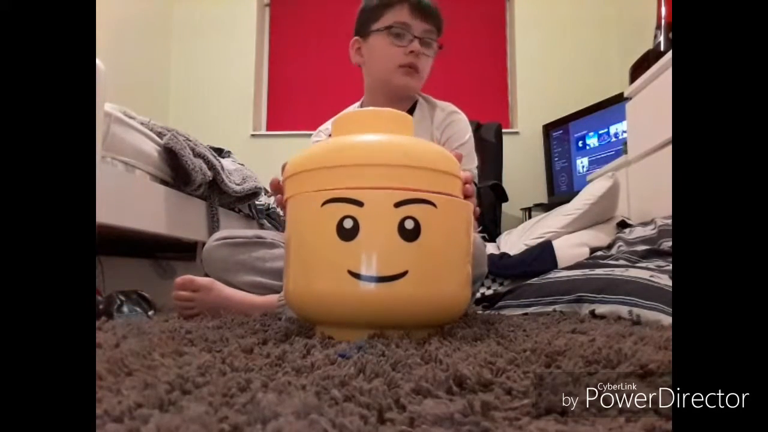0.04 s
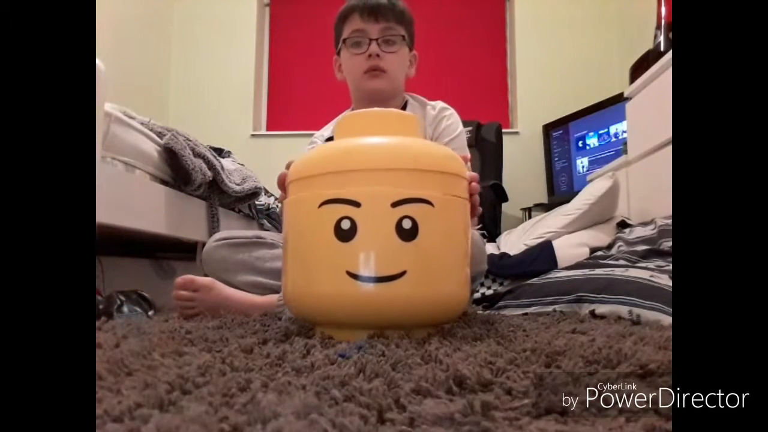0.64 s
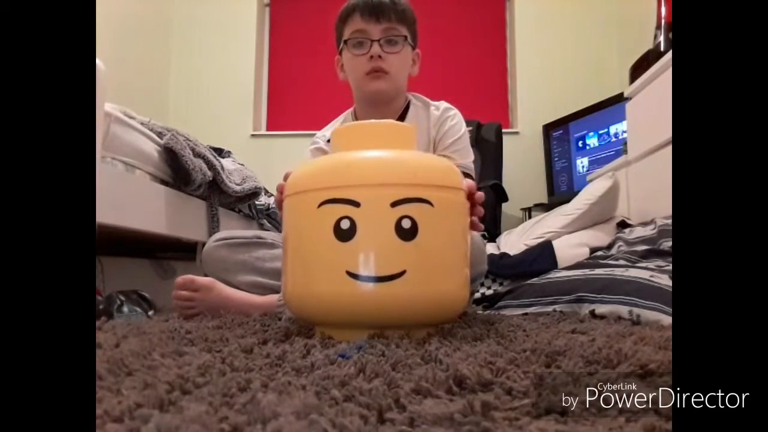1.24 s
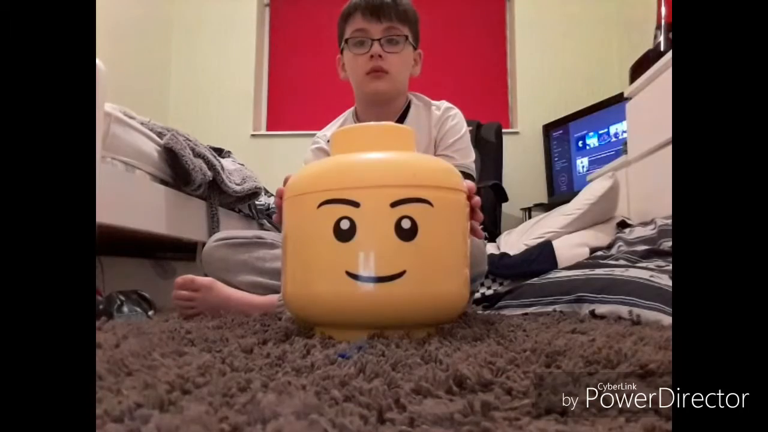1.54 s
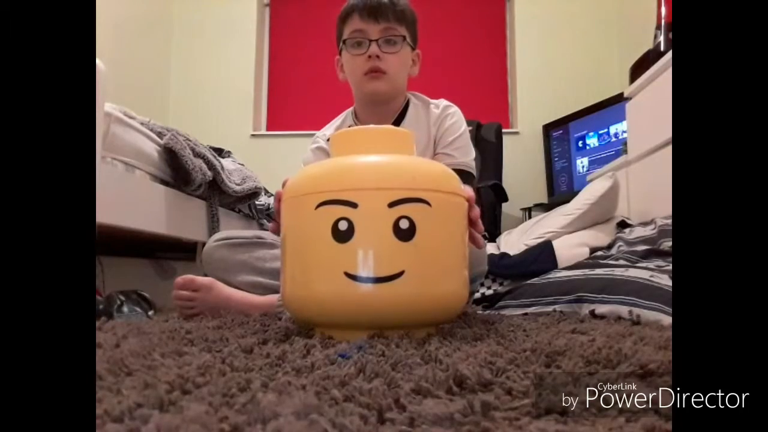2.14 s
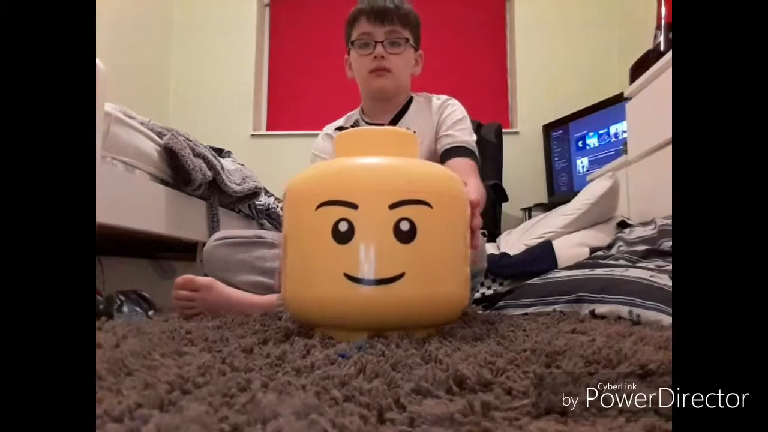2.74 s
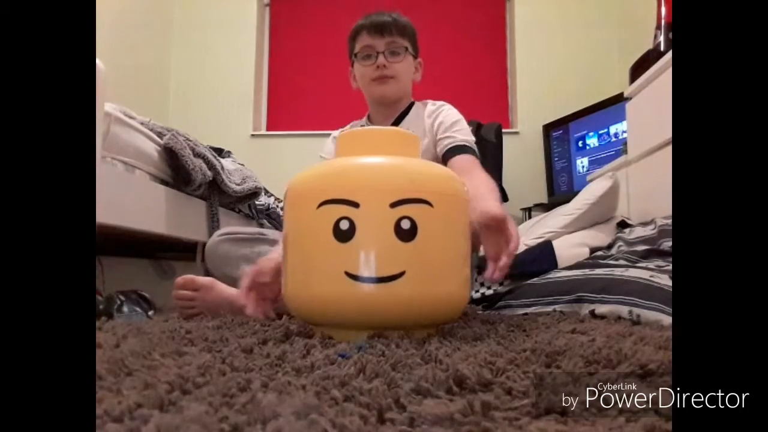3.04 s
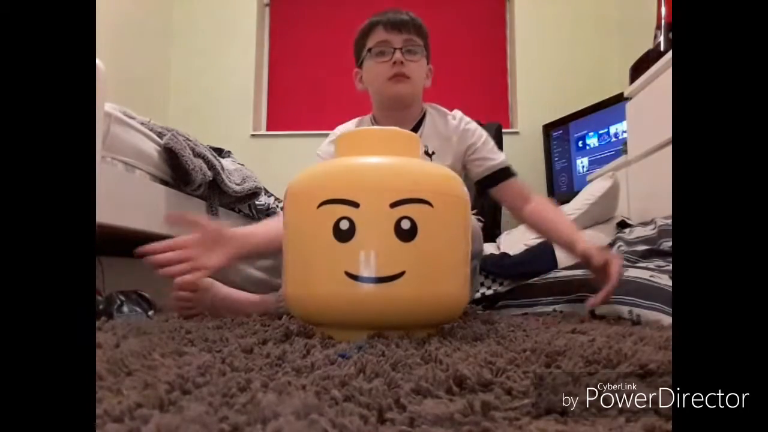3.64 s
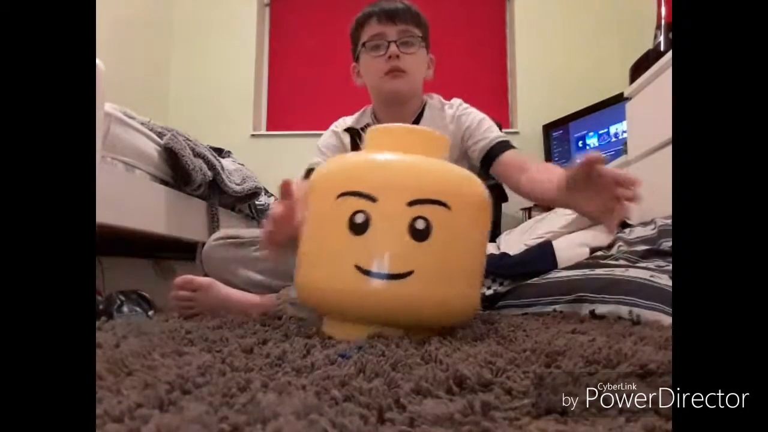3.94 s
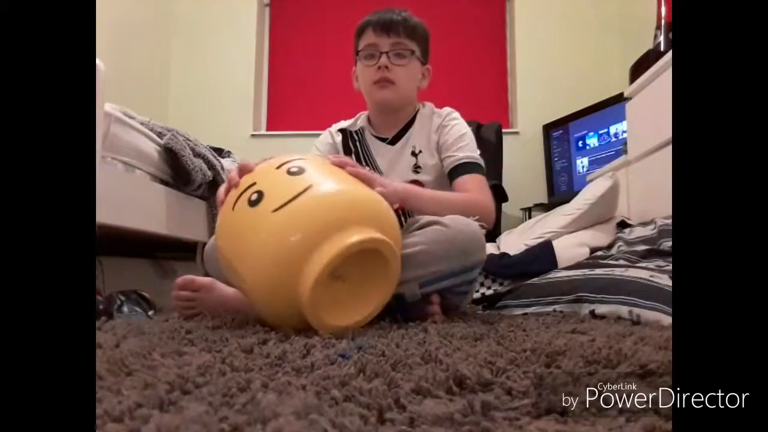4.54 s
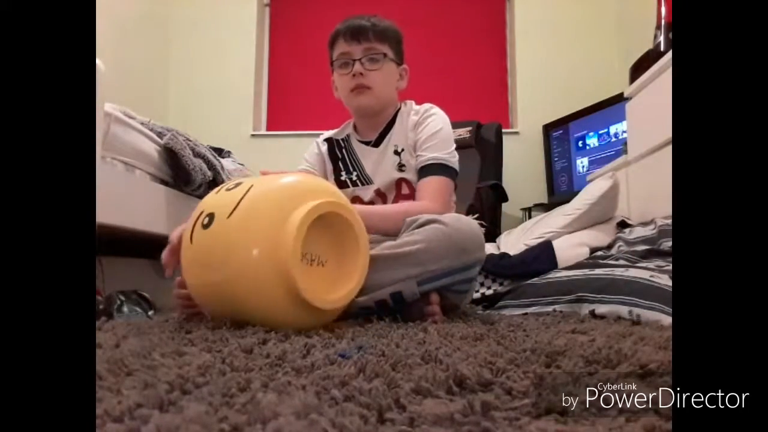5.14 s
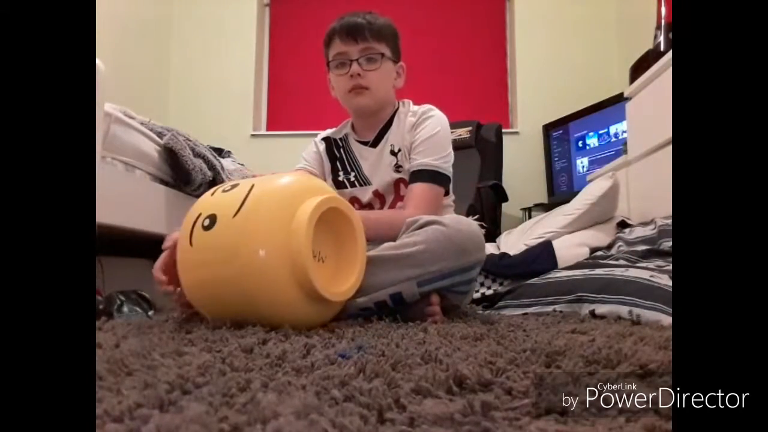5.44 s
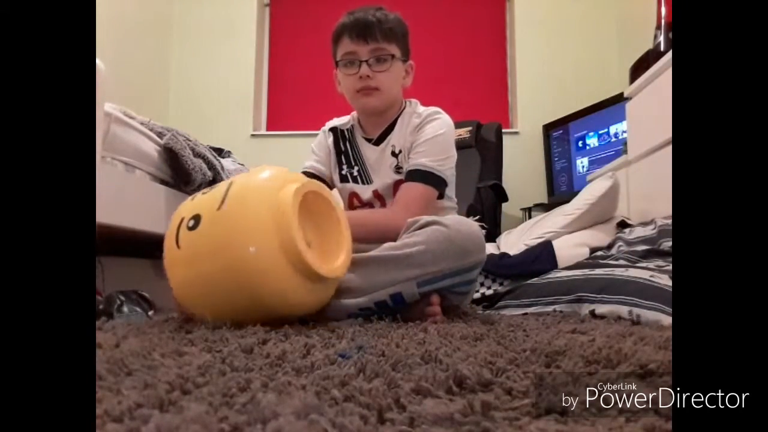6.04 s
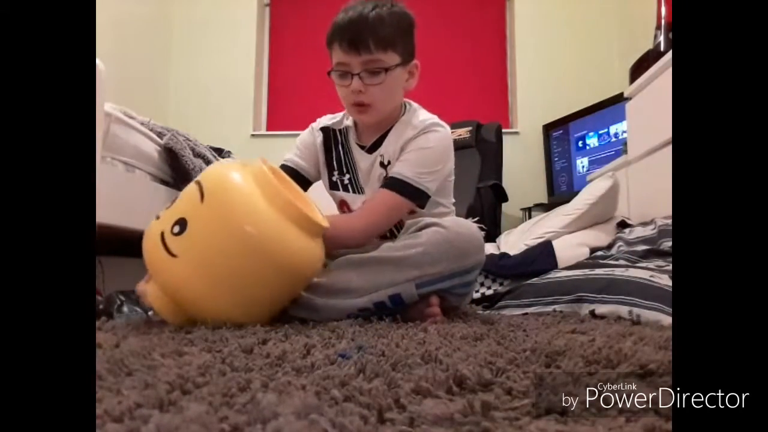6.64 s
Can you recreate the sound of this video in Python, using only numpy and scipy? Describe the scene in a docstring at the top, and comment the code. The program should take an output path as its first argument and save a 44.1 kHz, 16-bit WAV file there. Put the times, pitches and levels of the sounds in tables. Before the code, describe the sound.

Hands press the lid of a big hollow plastic container, making dull creaks and soft finger bumps. After a lull and a few faint taps and brushes of skin, two loud palm slaps make the tub ring briefly. It is then dragged over shaggy carpet with a low drone, a hiss and crisp crackles, ending in a few knocks and tiny squeaks. A small, sharp-sounding microphone picks it up close by in a small bedroom.

```python
"""Dull creaks and finger bumps come first: the lid of a big hollow plastic tub is pressed home,
sticking and slipping on its rim. Skin brushes the wall, then two palm slaps set the whole tub ringing.
Last, it is dragged through shaggy carpet: the wall drones, the fibres hiss and tufts snap free.
A small bedroom adds a short tail, and the small microphone has a sharp treble resonance."""
import sys
import numpy as np
from scipy import signal
from scipy.fft import rfft, irfft
from scipy.io import wavfile
from scipy.ndimage import uniform_filter1d

SR = 44100
rng = np.random.default_rng(int(sys.argv[2]) if len(sys.argv) > 2 else 0)


def master_out(mix):
    """Clip the mix to full scale and print it as 16-bit PCM to the path in sys.argv[1]."""
    frames = np.transpose(np.atleast_2d(mix))
    ceiling = np.clip(frames, -1, 1)
    pcm = np.round(ceiling * 32767).astype(np.int16)
    wavfile.write(sys.argv[1], SR, pcm)


N = 303849
TIME = np.arange(N) / SR


def from_db(db):
    return 10 ** (np.asarray(db) / 20)


def rms_one(x):
    return x / np.sqrt(np.mean(x ** 2) + 1e-20)


def peak_one(x):
    return x / (np.max(np.abs(x)) + 1e-20)


def add(track, start_s, sound):
    at = max(round(start_s * SR), 0)
    track[at:at + len(sound)] += sound[:N - at]


def band(x, low_hz, high_hz):
    edges = [low_hz, min(high_hz, .45 * SR)]
    return signal.sosfilt(signal.butter(2, edges, "band", fs=SR, output="sos"), x)


def equalise(x, curve, size=4096):
    """Minimum-phase EQ through points of f/Hz, gain/dB."""
    hz, db = np.transpose(curve)
    grid = np.maximum(np.arange(size // 2 + 1) * SR / size, 1)
    cepstrum = irfft(np.log(from_db(np.interp(np.log(grid), np.log(hz), db))))
    cepstrum[1:size // 2] *= 2
    cepstrum[size // 2 + 1:] = 0
    return signal.oaconvolve(x, irfft(np.exp(rfft(cepstrum))))[:N]


def grains(per_s, spread_db):
    """Tiny slips at random moments, of uneven size and either sign."""
    sizes = from_db(spread_db * np.minimum(rng.exponential(1, N), 4))
    return rms_one((rng.random(N) < per_s / SR) * sizes * rng.choice([-1, 1], N))


def flutter(depth_db, per_s):
    """A gain that wanders at random."""
    knots = np.arange(0, N / SR + 1, 1 / per_s)
    return rms_one(from_db(depth_db * np.interp(TIME, knots, rng.standard_normal(N)[:len(knots)])))


def swell(full_s, hold_s, rise_db_per_s, fall_db_per_s, step=16):
    """Envelope of a gesture: it fades up until full_s, holds and dies away."""
    t = TIME[::step] - full_s
    down_db = rise_db_per_s * np.maximum(-t, 0) + fall_db_per_s * np.maximum(t - hold_s, 0)
    return np.repeat(from_db(-np.minimum(down_db, 200)), step)[:N]


# EQ of the room's still air: f/Hz, gain/dB
AIR_EQ = [(20, -10), (45, -4.5), (130, -1), (330, -5.5), (600, -17), (1500, -28), (4000, -38.5),
          (8000, -43), (11000, -35), (15000, -69.5)]

def room_tone():
    """A faint, low bed of noise."""
    return from_db(-65.5) * rms_one(equalise(rng.standard_normal(N), AIR_EQ))


def bedroom(x, wet_db, build_s, mid_t60=0.28):
    """Reflections thicken within milliseconds and die quickly, the mids last."""
    t = TIME[:20000]
    zones = [(220, 536, 0.21), (986, 10300, mid_t60), (3480, .45 * SR, 0.24)]   # low/Hz, high/Hz, t60/s
    tail = sum(band(rng.standard_normal(len(t)), low, high) * from_db(-60 * t / t60)
               for low, high, t60 in zones)
    tail *= 1 - np.exp(-(t / build_s) ** 2)
    return x + from_db(wet_db) * signal.oaconvolve(x, tail / np.linalg.norm(tail))[:N]


# skin and sleeves graze the wall: t/s, hold/s, level/dB
GRAZES = [(0.055, .035, -58.5), (0.368, 0.05, -69), (2.857, .02, -60.5), (3.03, .07, -65.5),
          (3.138, 0.035, -59), (3.3, 0.14, -70), (3.517, 0.14, -74)]
# EQ of skin on plastic: f/Hz, gain/dB
SKIN_EQ = [(200, -24), (1000, -9.5), (3000, -6), (5000, -12.5), (8000, 0.5), (11000, 1.5), (15000, -10.5)]

def brush():
    """Soft hiss of skin and cloth on smooth plastic."""
    gestures = [from_db(db) * swell(s, hold, rise_db_per_s=120, fall_db_per_s=127)
                for s, hold, db in GRAZES]
    hiss = rms_one(equalise(grains(per_s=39000, spread_db=-4), SKIN_EQ))
    return from_db(-7) * np.max(gestures, axis=0) * hiss


# the rubbing locks into a creak or squeak: centre t/s, level/dB, f/Hz, half-length/s
SQUEAKS = [(0.02, -36.5, 283, 0.022), (0.301, -24.5, 247.5, 0.023), (.67, -37, 183, 0.024),
           (0.722, -35, 202.2, .018), (2.472, -51, 472, .014), (2.794, -45.5, 253.8, 0.031),
           (4.586, -25.5, 412.6, 0.011), (6.32, -35.5, 398, .025), (6.445, -28, 1880, 0.0057),
           (6.482, -27, 426, .009), (6.549, -23.5, 1413, 0.0057), (6.598, -31, 425, .008),
           (6.679, -21.5, 2492, 0.0025), (6.872, -40.5, 375.4, 0.02)]

def creaks(waver=0.091, octave_db=-13.5):
    """Regular stick-slip: a short swell on a wavering pitch, with its octave."""
    out = np.zeros(N)
    for s, db, hz, half_length in SQUEAKS:
        t = TIME[:int(6 * half_length * SR)]
        middle = t[-1] / 2
        wander = rms_one(uniform_filter1d(rng.standard_normal(len(t)), int(2 * SR / hz)))
        phase = 2 * np.pi * hz * np.cumsum(1 + waver * wander) / SR
        tone = np.sin(phase) + from_db(octave_db) * np.sin(2 * phase)
        envelope = np.exp(-((t - middle) / half_length) ** 2)
        add(out, s - middle, from_db(db - 1.5) * envelope * tone)
    return out


# modes of the tub and the air inside; the lowest three beat: f/Hz, level/dB, t60/s at damping 1
TUB_MODES = [(95, -17, 0.34), (105, -3.5, 0.12), (110, -13.5, 0.27), (149.4, -18, 0.36),
             (176.5, -9.5, 0.22), (269, -8, 0.09), (299.7, -4.5, 0.08), (344.4, -10, 0.14),
             (422, -11, 0.092), (473.5, -12.5, 0.037), (648, -14, 0.049), (715, -19, 0.045),
             (976, -16.5, 0.033)]

def tub_ring(damping):
    """Each mode's strength varies with the spot touched; hands and carpet damp the ring."""
    hz, db, t60 = np.transpose(TUB_MODES)[:, :, None]
    t = TIME[:16384]
    spot_db = rng.normal(0, 1.5, db.shape)
    return np.sum(from_db(db + spot_db - 60 * t * damping / t60) * np.sin(2 * np.pi * hz * t), axis=0)


def rubbed_wall(slips, curve, damping, ring_db):
    """Slips shake the wall directly and through its modes."""
    ring = rms_one(signal.oaconvolve(slips, np.diff(tub_ring(damping)))[:N])
    return rms_one(equalise(slips + from_db(ring_db) * ring, curve))


# hands press and the lid creeps on the rim: t/s, hold/s, groan/dB, rasp/dB
LID_PRESSES = [(0.022, 0.07, -36.5, -54.5), (0.227, .015, -42.5, -61.5), (0.286, 0.017, -29.5, -59),
               (0.358, 0.073, -44, -60.5), (0.538, 0.073, -55, -73), (0.667, 0.14, -46.5, -71),
               (0.867, 0.052, -50, -72), (0.99, 0.03, -57.5, -70.5), (2.745, 0.045, -42, -65.5),
               (2.852, 0.054, -55, -67), (3.563, 0.16, -68, -73.5)]
# thin resonances of the rim: f/Hz, width/Hz, level/dB
RIM_MODES = [(1090, 160, 6.5), (1830, 150, 2), (2640, 260, -6), (3740, 42, -6.5), (6500, 160, -15)]
# EQs of the lid's low groan and midrange rasp: f/Hz, gain/dB
GROAN_EQ = [(50, -49), (110, -5), (190, 6.5), (255, 8), (330, -4.5), (480, -3), (750, -16), (1500, -60.5)]
RASP_EQ = [(80, -36), (400, -24.5), (1500, 6), (3000, -8), (5000, -36), (15000, -34)]

def lid():
    """Stick-slip on the rim: a hollow groan, and a dry rasp that sings in the rim's resonances."""
    groan_gain, rasp_gain = sum(
        from_db(levels_db)[:, None] * swell(s, hold, rise_db_per_s=420, fall_db_per_s=256.5)
        for s, hold, *levels_db in LID_PRESSES)
    slips = grains(per_s=700, spread_db=3.5)
    groan = rubbed_wall(slips, GROAN_EQ, damping=2.1, ring_db=-14.5)
    grit = slips + grains(per_s=3500, spread_db=3.5)
    sing = sum(from_db(db) * signal.lfilter(*signal.iirpeak(hz, hz / width, fs=SR), grit)
               for hz, width, db in RIM_MODES)
    rasp = rms_one(sing) + rms_one(equalise(grit, RASP_EQ))
    return from_db(-6.5) * groan_gain * groan + from_db(-10) * rasp_gain * rasp


# EQs of a hit's plastic clack and bright contact tick: f/Hz, gain/dB
CLACK_EQ = [(80, -7), (300, 2), (700, 5), (1100, -5), (1600, 3.5), (2100, -7.5), (2900, -9), (4500, -20),
            (15000, -37)]
TICK_EQ = [(200, -45), (1500, -29), (4000, -6), (8500, 4.5), (15000, 4.5)]

def hits(rows, damping, ring_trim_db, clack_t60, tick_trim_db, tick_t60, clack_trim_db=-1.5):
    """The struck panel flexes, the whole tub rings, its dense upper modes clack and the contact ticks."""
    out = np.zeros(N)
    for s, flex_db, flex_hz, flex_t60, ring_db, clack_db, tick_db in rows:
        ring = tub_ring(damping)
        t = TIME[:len(ring)]
        attack = 1 - np.exp(-4 * t * flex_hz)   # soft skin: the force builds over a quarter cycle
        flex = attack * from_db(-60 * t / flex_t60) * np.sin(2 * np.pi * flex_hz * t)
        add(out, s, from_db(flex_db) * peak_one(flex))
        add(out, s, from_db(ring_db + ring_trim_db) * peak_one(ring))
        for db, t60, curve in [(clack_db + clack_trim_db, clack_t60, CLACK_EQ),
                               (tick_db + tick_trim_db, tick_t60, TICK_EQ)]:
            burst = equalise(rng.standard_normal(len(t)) * from_db(-60 * t / t60), curve)
            add(out, s, from_db(db) * peak_one(burst))
    return out


# fingers and legs bump the held tub: t/s, flex level/dB, flex f/Hz, flex t60/s, clack/dB
BUMPS = [(0.036, -30.5, 260, 0.028, -58), (0.148, -36, 215, 0.049, -52), (0.2285, -33, 265, 0.027, -48),
         (0.355, -28, 234, 0.061, -41.5), (0.4191, -26, 220, 0.049, -44), (0.749, -29, 211, 0.023, -56),
         (0.763, -29.5, 174, .05, -64), (0.795, -35, 173, 0.045, -58), (0.889, -34.5, 158.5, 0.065, -56),
         (2.092, -48, 127, .03, -67), (2.21, -49, 114, 0.069, -65), (2.287, -37, 166, 0.012, -59),
         (2.309, -38.5, 144, 0.027, -57.5), (2.37, -37, 200, 0.0075, -65), (2.455, -40.5, 264, 0.015, -53),
         (2.587, -41, 257, 0.036, -51.5), (2.631, -45, 276, 0.0058, -62), (2.91, -39.5, 110, 0.023, -56),
         (2.98, -42.5, 80.6, 0.064, -61), (3.569, -40.5, 164, 0.011, -62), (4.17, -30.5, 397, 0.0092, -47),
         (4.49, -38.5, 120, 0.035, -38.5), (4.516, -29.5, 490, 0.0075, -49.5),
         (4.574, -36.5, 150, 0.07, -46), (5.1439, -23, 427, 0.0032, -39.5), (6.242, -31, 380, 0.011, -58),
         (6.425, -23, 403, 0.046, -30), (6.521, -23, 420, 0.033, -24.5), (6.661, -18.5, 304, 0.046, -20.5),
         (6.776, -32.5, 296, 0.067, -48)]

def knocks(ring_db_per_octave=-14):
    """Light bumps; a soft, low-pitched spot sets more of the whole tub ringing."""
    rows = [(s, db, hz, t60, db + ring_db_per_octave * np.log2(hz / 100), clack_db, clack_db)
            for s, db, hz, t60, clack_db in BUMPS]
    return hits(rows, damping=0.38, ring_trim_db=-7, clack_t60=0.092, tick_trim_db=-5.5, tick_t60=0.014)


# palm and lid impacts: t/s, flex level/dB, flex f/Hz, flex t60/s, ring/dB, clack/dB, tick/dB
PALM_HITS = [(3.897, -12.5, 177, 0.038, -38, -19, -21.5), (3.9048, -12.5, 422, 0.0078, -7.5, -13, -42),
             (3.9115, -31, 285, 0.015, -31, -16, -23), (3.924, -13.5, 206, 0.027, -34, -13.5, -21.5),
             (3.9405, -17, 268, 0.013, -29, -16, -24), (4.2565, -13, 263, 0.034, -15, -16, -16.5),
             (4.267, -9, 460, 0.002, -13.5, -23, -36.5), (4.276, -17, 283, 0.0066, -23, -16, -45)]

def slaps():
    """Two tight clusters of hits: a palm lands and the lid jolts on its rim."""
    return hits(PALM_HITS, damping=0.96, ring_trim_db=0.5, clack_t60=0.076,
                tick_trim_db=-1.5, tick_t60=0.06)


# pulls through the pile: start t/s, full speed t/s, hold/s, stop t/s, rise/(dB/s), fall/(dB/s),
# friction/dB, wall drone/dB, fibre crackle/dB
DRAG_STROKES = [(4.4, 4.595, .095, 4.927, 229, 219, -32, -32.5, -18),
                (5.004, 5.487, 0.013, 6.014, 72.5, 45, -34.5, -32.5, -22.5),
                (6.14, 6.378, 0.13, 6.65, 108, 81, -34, -33.5, -25.5),
                (6.669, 6.676, 0.013, 6.78, 260, 210, -35, -30, -29.5),
                (6.774, 6.78, 0.025, 7.07, 198, 40, -48.5, -47.5, -41)]

def drag_envelopes(stick_db_per_s=304, drone_lead_s=0.021, crackle_power=1.327):
    """Friction, drone and crackle gains: each stroke breaks loose, speeds up, slows and sticks."""
    creep_db = [-67.5, -57.5, -68.5]   # a floor from 5 to 6 s, as the tub creeps in the pile
    gains = from_db(creep_db)[:, None] * swell(5, 1, stick_db_per_s, stick_db_per_s)
    for start, full, hold, stop, rise, fall, *levels_db in DRAG_STROKES:
        loose = swell(start, stop - start, stick_db_per_s, stick_db_per_s)
        speed = swell(full, hold, rise, fall)
        load = swell(full - drone_lead_s, hold, rise, fall)   # the wall loads before the fibres give
        stroke = from_db(levels_db)[:, None] * loose * [speed, load, speed ** crackle_power]
        gains = np.maximum(gains, stroke)
    return gains


# EQs of the droning wall, the sliding friction and the crackling fibres: f/Hz, gain/dB
DRONE_EQ = [(40, -37.5), (130, -12), (250, -3.5), (400, -0.5), (560, -0.5), (800, -7.5), (1500, -4.5),
            (4000, -53)]
FRICTION_EQ = [(60, -37), (250, -24.5), (600, -0.5), (1200, 1), (1650, 6.5), (2600, 4.5), (4000, 4.5),
               (7000, -13.5), (15000, -6)]
FIBRE_EQ = [(200, -50), (1500, -41), (3500, -15.5), (5500, 3), (8500, 1.5), (11000, -4.5), (15000, -7)]

def carpet_drag(friction, drone, crackle):
    """Thousands of fibres slip under the tub: the wall drones, the pile hisses and crackles."""
    catching = flutter(depth_db=2, per_s=130)   # the rim catches and lets go unevenly
    slips = grains(per_s=1500, spread_db=0.5)
    wall = from_db(-3.5) * drone * rubbed_wall(slips, DRONE_EQ, damping=1.7, ring_db=-15)
    hiss = from_db(-0.5) * friction * rms_one(equalise(grains(per_s=6000, spread_db=3), FRICTION_EQ))
    # tufts let go in clumps, which ring briefly in six treble bands
    clumps = sum(band(grains(per_s=160, spread_db=5.5), hz / 1.13, hz * 1.09)
                 for hz in np.geomspace(3500, 13000, num=6))
    fibres = equalise(grains(per_s=2600, spread_db=4.5), FIBRE_EQ)
    pile = crackle * (from_db(-11) * rms_one(fibres) + from_db(-18.5) * rms_one(clumps))
    # the faster the stroke, the more fizz on top
    fizz_gain = from_db(-12.5) * crackle * (crackle / crackle.max()) ** 1.3
    fizz = fizz_gain * rms_one(band(grains(per_s=340, spread_db=-5.5), 11200, 16000))
    return catching * (wall + hiss + pile + fizz)


def small_tufts(crackle, per_s=28, above_crackle_db=3, spread_db=3.5):
    """Lesser tufts snap at random while the pile crackles: rows of t/s, level/dB."""
    chance, size = rng.random(N), rng.standard_normal(N)
    crackling = crackle > crackle.max() / 100
    at = np.flatnonzero(crackling & (chance < per_s / SR))
    return list(zip(TIME[at], 20 * np.log10(crackle[at]) + above_crackle_db + spread_db * size[at]))


# the biggest tufts catch on the rim and snap free: t/s, level/dB
BIG_TUFTS = [(4.4925, -38), (4.561, -16.5), (4.6197, -9.5), (4.6743, -21), (5.1225, -36.5), (5.2664, -23),
             (5.3023, -29), (5.333, -23.5), (5.3735, -16.5), (5.3798, -21), (5.4044, -20), (5.4585, -15),
             (5.503, -11), (5.5233, -16), (5.5863, -24), (5.616, -16.5), (5.6343, -20), (5.681, -12.5),
             (5.7146, -14), (5.7381, -18), (5.7491, -22), (5.7768, -19.5), (5.7966, -24), (5.847, -26),
             (6.0562, -28.5), (6.12, -41), (6.1721, -33.5), (6.2274, -37), (6.3658, -27), (6.3902, -22),
             (6.4114, -16), (6.424, -16), (6.4658, -20.5), (6.5212, -16), (6.5315, -15.5), (6.6374, -21),
             (6.6608, -16.5), (6.7138, -24), (6.8027, -17.5)]

def tuft_snaps(crackle, decay_s=0.00053, centre_hz=7230, edge_ratio=1.43):
    """Each freed tuft gives a bright burst about a millisecond long, with a sharper click of release."""
    tufts = list(BIG_TUFTS) + small_tufts(crackle)
    out, t = np.zeros(N), TIME[:512]
    decay = np.exp(-t / decay_s)
    bursts = rng.standard_normal((len(tufts), len(t))) * t * decay
    bodies = band(bursts, centre_hz / edge_ratio, centre_hz * edge_ratio)
    clicks = band(bursts * decay, 10000, 14500)
    for (s, db), body, click in zip(tufts, bodies, clicks):
        add(out, s, from_db(db - 0.5) * (peak_one(body) + from_db(-3) * peak_one(click)))
    return out


def scene():
    """The hands are behind the tub and sound roomier; the pile is close to the microphone and drier."""
    palms, fingers = slaps(), knocks()
    rubbing = lid() + brush() + creaks()
    far = bedroom(palms, wet_db=-7, build_s=0.0088) + bedroom(rubbing, wet_db=-9, build_s=0.0092)
    far += bedroom(fingers, wet_db=-3, build_s=0.0054, mid_t60=0.32)   # on the side facing the room
    friction, drone, crackle = drag_envelopes()
    carpet = tuft_snaps(crackle) + carpet_drag(friction, drone, crackle)
    near = bedroom(carpet, wet_db=-15, build_s=0.0015)
    low_cut = signal.butter(3, 66, "high", fs=SR, output="sos")   # the tub radiates little deep bass
    return (signal.sosfilt(low_cut, far + near) + room_tone())[None]


# response of the small microphone: f/Hz, gain/dB
MIC_EQ = [(4000, 0.5), (6500, 0.5), (7700, 6.5), (8450, 12.5), (9200, 5.5), (10300, -8), (12500, -14.5),
          (15500, -19.5)]

def record(dry):
    """The microphone port rings in the treble, the preamplifier hisses faintly, the top is cut."""
    heard = equalise(dry[0], MIC_EQ) + from_db(-91.5) * rng.standard_normal(N)
    high_cut = signal.ellip(10, .2, 70, 15850, fs=SR, output="sos")
    return signal.sosfilt(high_cut, heard)[None]


dry = scene()
out = record(dry)
master_out(out)
```